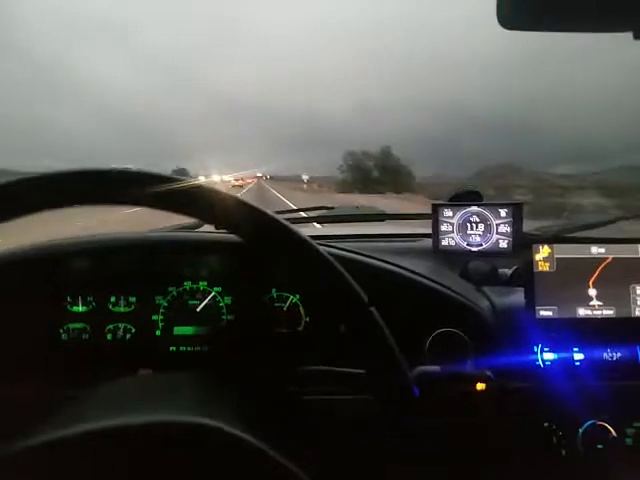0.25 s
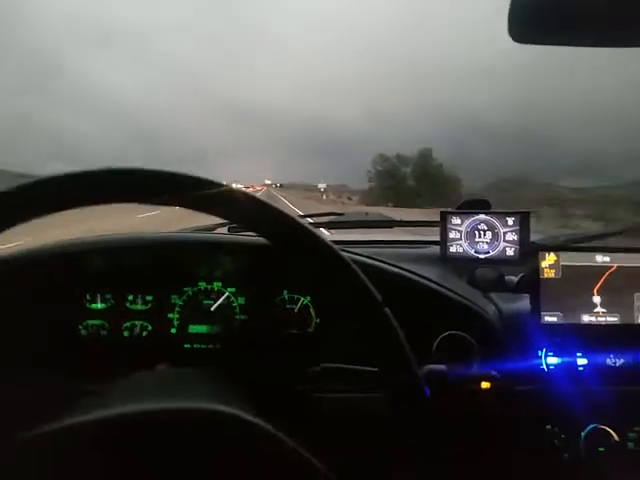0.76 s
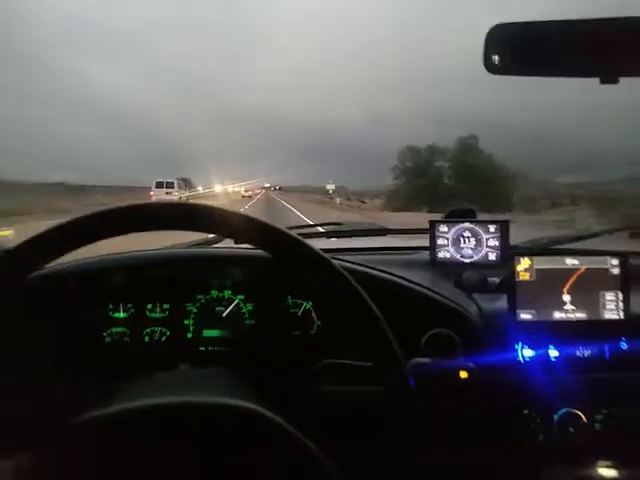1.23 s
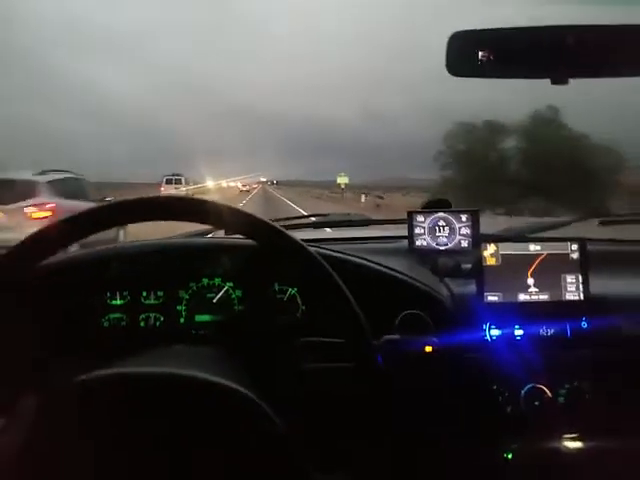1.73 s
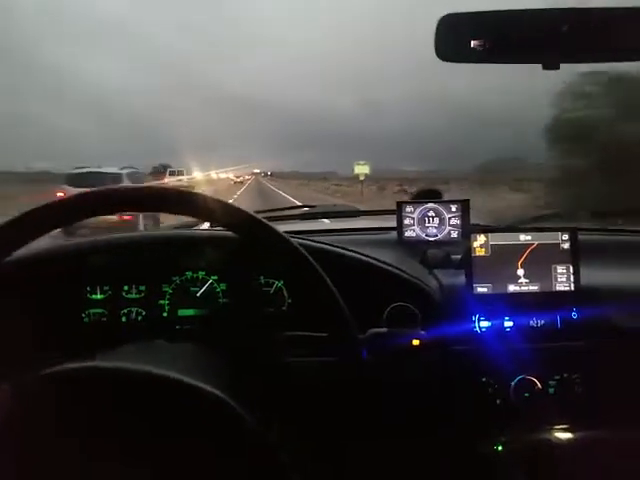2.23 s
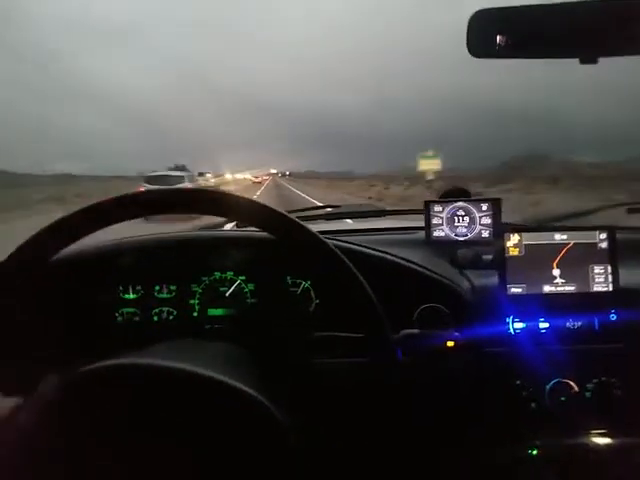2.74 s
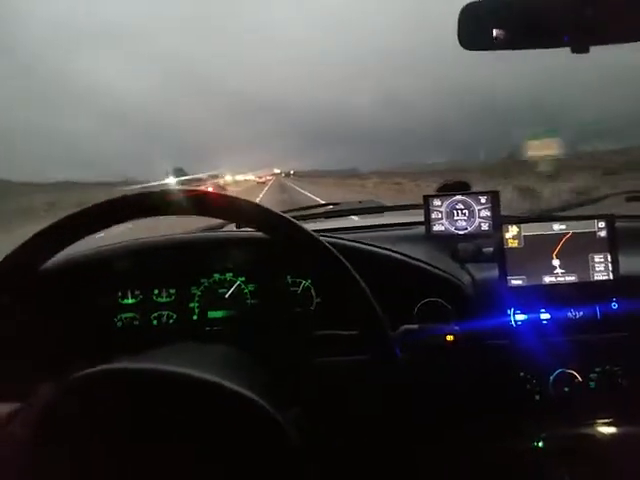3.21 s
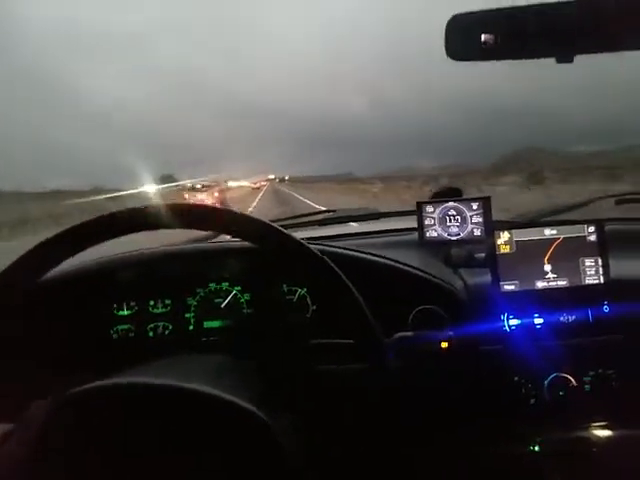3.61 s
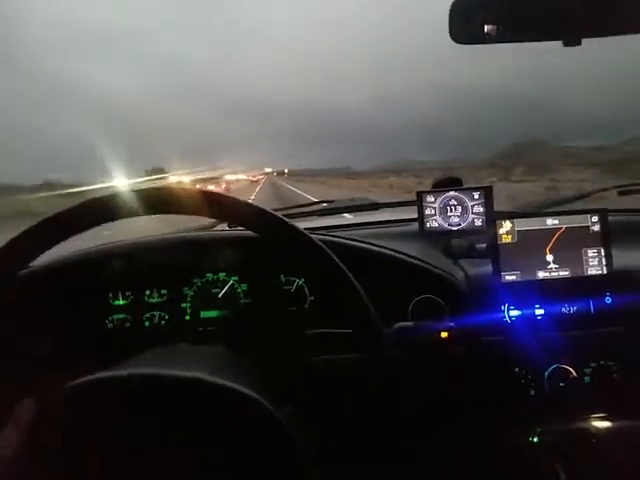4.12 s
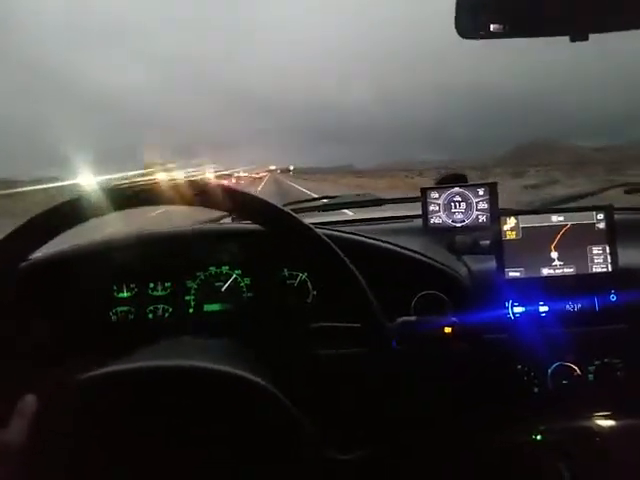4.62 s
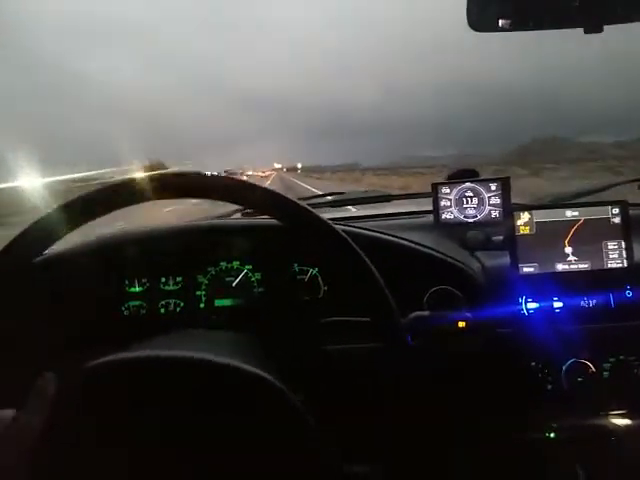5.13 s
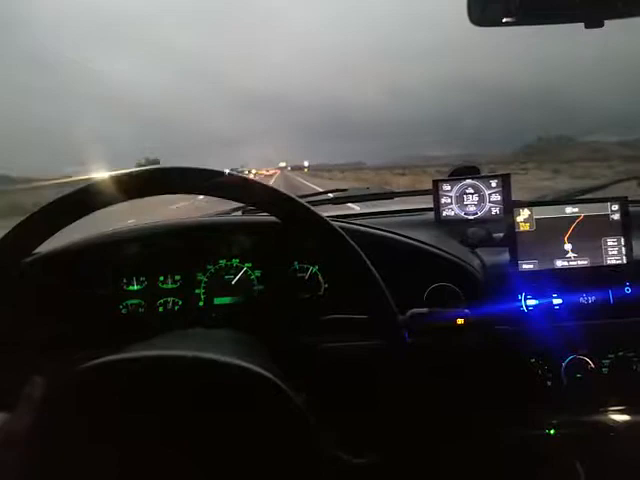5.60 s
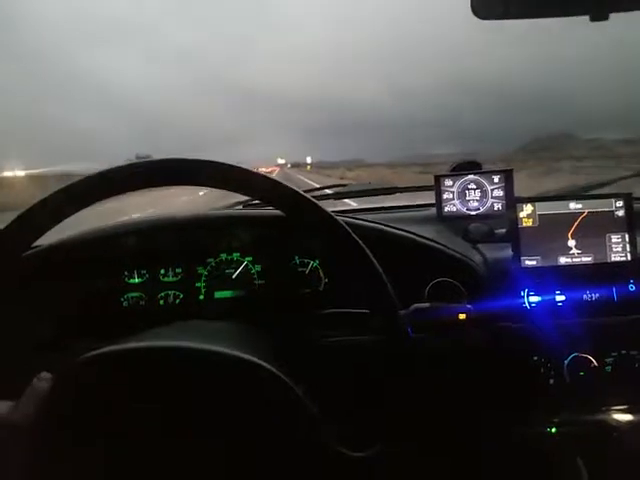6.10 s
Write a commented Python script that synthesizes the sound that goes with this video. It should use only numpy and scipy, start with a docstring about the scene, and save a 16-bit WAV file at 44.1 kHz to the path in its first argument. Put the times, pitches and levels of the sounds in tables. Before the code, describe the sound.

Inside a diesel pickup cab climbing under load, a loud steady deep exhaust drone over tyre rumble, faint turbo whistle and clatter.

```python
"""Diesel pickup cab on a long grade

Inside the cab of a V8 turbo-diesel pickup that tows uphill at nearly steady speed. Sines on the engine orders make
the exhaust drone; uneven firings set off ringing knocks and noisy clatter. The turbo is a whistle with an octave,
flutter and rush that climbs with the fuel. The drive shaft hums over shaped noise for tyres and wind, and a car
overtakes on the left."""
import sys
import numpy as np
from scipy import signal
from scipy.fft import rfft, irfft, next_fast_len
from scipy.io import wavfile
from scipy.ndimage import uniform_filter1d, minimum_filter1d

SR = 44100
rng = np.random.default_rng(int(sys.argv[2]) if len(sys.argv) > 2 else 0)


def wav_record(signal):
    """Record a signal, one row per channel, as 16-bit PCM in the file named by sys.argv[1]."""
    frames = np.transpose(np.atleast_2d(signal))
    bounded = np.clip(frames, -1, 1)
    # unit amplitude maps onto the largest positive 16-bit level
    quanta = np.round(bounded * 32767).astype(np.int16)
    wavfile.write(sys.argv[1], SR, quanta)


N = 280035

# exhaust orders, as multiples of the four-stroke cycle (8 is the firing rate): order, left_db, right_db
EXHAUST_ORDERS = [(2, -30, -31.5), (3, -35.5, -41), (4, -19, -22.5), (6, -21, -24.5), (7, -46.5, -43),
                  (8, -13.5, -14.5), (9, -30, -44.5), (12, -44, -40), (14, -30.5, -31.5),
                  (15, -27.5, -31.5), (16, -49, -54), (17, -48, -51), (18, -36, -36), (19, -46, -54.5),
                  (20, -37.5, -52.5), (21, -53, -56), (22, -55, -55), (24, -45.5, -43), (25, -45, -56),
                  (26, -40.5, -47), (27, -40.5, -52), (28, -39, -51), (31, -52.5, -45), (33, -46, -59),
                  (35, -44, -48), (37, -43, -52.5)]
# strength of each cylinder in firing order: level_db
CYLINDER_LEVELS = [0, 1.5, -4.5, -1.5, -4, -4.5, -1.5, -3]
# spectrum of the knock through the bulkhead: freq_hz, density_db
KNOCK_SPECTRUM = [(420, -30), (530, -9.5), (640, -1), (720, -5.5), (820, 4), (940, -1), (1250, -6),
                  (1750, -18), (2450, -14), (3200, -22), (6000, -34.5)]
# spectrum of the combustion clatter: freq_hz, density_db
CLATTER_SPECTRUM = [(200, -13.5), (350, 4.5), (520, -5), (640, -3), (830, -4), (1000, -15.5), (1600, -19),
                    (2300, -17), (3200, -24.5), (5500, -34.5), (9000, -33.5)]
# spectrum of tyre rumble through the floor: freq_hz, density_db
TYRE_SPECTRUM = [(10, -25.5), (32, -3.5), (55, -6), (90, -3), (120, -1.5), (170, 3), (225, -1.5), (255, 0),
                 (295, -10), (400, -6.5), (500, -19), (900, -22), (2000, -38.5)]
# spectrum of wind along the door seals: freq_hz, density_db
WIND_SPECTRUM = [(600, -16), (900, -7), (1300, -2), (1700, -5.5), (2150, -3), (2600, -8), (3000, -13),
                 (3900, -15), (5200, -16), (6300, -19.5), (7300, -20), (8300, -35), (14000, -44.5)]
# resonance of the turbo's intake duct: freq_hz, gain_db
DUCT_RESONANCE = [(6800, -8.5), (7200, 0), (7600, 4.5), (7820, -1), (8100, -16.5)]
# the driver's foot, joined by straight lines: time_s, fuel_share (0-1 of full fuel)
FUEL_PEDAL = [(0.0, 0.665), (0.26, 0.72), (1.57, 0.718), (2.32, 0.617), (3.15, 0.579), (3.6, 0.965),
              (4.83, 0.89), (5.01, 0.915), (6.35, 0.813)]
# swells and dips of the whistle: centre_s, half_length_s, blade_gain_db, octave_gain_db
WHISTLE_FLARES = [(.5, 0.11, 5, -5), (.98, .11, 2, 6), (1.24, .14, 18.5, 3), (1.42, .08, 0, 7),
                  (3.62, 0.17, 12, 1), (4.23, .11, -4, 5), (5.868, .13, 8, 3)]
# spectrum of the hiss at the glass: freq_hz, density_db
GLASS_SPECTRUM = [(9000, -4.5), (13000, 1.5), (16000, 2)]
# spectrum of the passing car's tread: freq_hz, density_db
TREAD_SPECTRUM = [(550, -11.5), (800, 0.5), (1050, -6.5), (1700, -14.5), (2600, -13), (3200, -25.5)]

CYLINDERS = len(CYLINDER_LEVELS)
TIME_S = np.arange(N) / SR
PORT_LAG_S = 0.000385  # sound from the driver's side reaches the left port first
# the speed a steady foot would hold on this grade; truck and trailer are slow to follow
BASE_RPM, RPM_PER_FUEL, TRUCK_LAG_S = 2657, 128.6, 1.67
# the turbo's blade tone follows the fuel much sooner
BASE_HZ, HZ_PER_FUEL, TURBO_LAG_S = 6000, 2000, .25
PULL_DB = 8.5  # rise of the firing order per unit of fuel beyond what holds the present speed
# peak levels at the mean turbo speed, before fades, flares and panning
WHISTLE_DB, OCTAVE_DB = -59, -62.0
WHISTLE_DB_PER_HZ, OCTAVE_DB_PER_HZ = 0.0035, 0.0109  # both grow as the wheel speeds up
# the car: when it is level with the window, how much faster it goes, how far aside
ABREAST_S, OVERTAKE_M_S, LANE_M = .55, 2.7, 5.3
CAR_DB = -38.5  # its tyres when abreast, before panning
CEILING, TOP_HZ = .96, 15720  # limiter's peak and upper edge of the band


def undb(db):
    """Turn decibels into gain."""
    return 10 ** (np.asarray(db) / 20)


def level(x, db):
    """Set the rms level."""
    return x * undb(db) / np.sqrt(np.mean(x ** 2))


def pan(db):
    """Gains of the two ports for a left minus right level."""
    return undb(np.array([[db], [-db]]) / 2)


def walk(rate):
    """Smooth random drift of rms 1 that changes about rate times a second."""
    f = np.fft.rfftfreq(N, 1 / SR)
    push = rng.standard_normal(len(f)) + 1j * rng.standard_normal(len(f))
    drift = irfft(push / (1 + (f / rate) ** 2), next_fast_len(N))[:N]
    return level(drift, 0)


def lag(x, lag_s):
    """Follow a control with inertia, starting settled."""
    keep = np.exp(-1 / (lag_s * SR))
    return x[0] + signal.lfilter([1 - keep], [1, -keep], x - x[0])


def colour(x, spectrum):
    """Filter by a spectrum on a log frequency scale, with steep ends."""
    f = np.fft.rfftfreq(N, 1 / SR) + 1  # keeps clear of zero
    hz, db = np.transpose(spectrum)
    ends = np.minimum(f / hz[0], 1) ** 2 * np.minimum(hz[-1] / f, 1) ** 2
    gain = undb(np.interp(np.log(f), np.log(hz), db))
    return irfft(rfft(x) * ends * gain, N)


def cab_noise(alike_hz, direct):
    """Noise at two ports: long waves alike, short ones diffuse, plus a direct share that arrives with a lag."""
    f = np.fft.rfftfreq(N, 1 / SR)
    mid, side, near = rfft(rng.standard_normal((3, N)))
    alike = 1 / (1 + (f / alike_hz) ** 2)
    common = mid * np.sqrt(1 + alike)
    opposed = np.array([[1], [-1]]) * side * np.sqrt(1 - alike)
    diffuse = (common + opposed) / np.sqrt(2)
    lagged = near * np.exp(-2j * np.pi * f * np.array([[0], [PORT_LAG_S]]))
    return irfft(diffuse + direct * (1 - alike) * lagged, N)


def reflections(x, share, ring_s):
    """Early echoes off glass and trim leave fine fixed ripples in the spectrum at each port."""
    t = np.arange(SR // 20) / SR
    tail = rng.standard_normal((2, len(t))) * np.exp(-t / ring_s)
    tail = tail / np.sqrt(np.sum(tail ** 2, axis=1, keepdims=True))
    return x + share * signal.oaconvolve(x, tail, axes=1)[:, :N]


def road(car_near, tyres_db, wind_db, hiss_db, wake_db):
    """Tyres rumble through the floor; wind rushes at the seals and hisses at the glass, more in the car's wake."""
    rumble = colour(cab_noise(alike_hz=740, direct=1.0), TYRE_SPECTRUM)
    tyres = level(rumble, tyres_db) * undb(0.35 * walk(8.3)) * pan(0.39)
    seals = reflections(cab_noise(alike_hz=500, direct=0.85), share=0.87, ring_s=0.018)
    wind = level(colour(seals, WIND_SPECTRUM), wind_db) * pan(-0.65)
    glass = reflections(cab_noise(alike_hz=700, direct=0.17), share=0.22, ring_s=.015)
    hiss = level(colour(glass, GLASS_SPECTRUM), hiss_db) * pan(3)
    return tyres + (wind + hiss) * undb(wake_db * car_near)


def overtaking(car_near):
    """A car's tyres sing through the driver's window and fade with distance and angle as it draws ahead."""
    tread = colour(cab_noise(alike_hz=600, direct=1.2), TREAD_SPECTRUM)
    return level(tread, CAR_DB) * car_near ** 2 * pan(2.4)


def shaft(cycle, db):
    """In overdrive the drive shaft turns 4/3 as fast as the crank; its joints hum four times a turn."""
    turns = 2 * cycle * 4 / 3  # the crank turns twice per cycle
    phase = 2 * np.pi * 4 * turns + .6 * walk(3)
    return level(np.sin(phase) * undb(2 * walk(4.6)), db)


def turbulence(rate):
    """Turbulence shakes size and phase, differently at each port."""
    return np.array([walk(rate) + 1j * walk(rate) for _ in range(2)])


def turbo(cycle, fuel, jitter_hz, fade_db, octave_rush_db, flutter_db, rush_db):
    """Blades whistle with an octave; exhaust pulses add side tones that ring in the duct with rushing air."""
    hz = BASE_HZ + HZ_PER_FUEL * lag(fuel, TURBO_LAG_S)
    speeding_hz = hz - hz.mean()
    first_db = WHISTLE_DB + WHISTLE_DB_PER_HZ * speeding_hz + fade_db * walk(5)
    second_db = OCTAVE_DB + OCTAVE_DB_PER_HZ * speeding_hz
    for centre_s, half_s, blade_db, octave_db in WHISTLE_FLARES:
        flare = np.exp(-((TIME_S - centre_s) / half_s) ** 2)
        first_db = first_db + blade_db * flare
        second_db = second_db + octave_db * flare
    blade = np.exp(2j * np.pi * np.cumsum(hz + jitter_hz * walk(20)) / SR)
    first = np.real((1 + .3 * turbulence(9)) * blade) * undb(first_db)
    # the faster the wheel spins, the more its octave frays into hiss
    fray = undb(octave_rush_db + 5 * speeding_hz / np.ptp(hz))
    second = np.real((1 + fray * turbulence(200)) * blade ** 2) * undb(second_db)
    pulsing = np.sin(2 * np.pi * CYLINDERS * cycle)
    side_tones = np.real((1 + .5 * turbulence(15)) * blade) * pulsing
    flutter = level(colour(side_tones, DUCT_RESONANCE), flutter_db)
    rush = level(colour(np.real(turbulence(260) * blade), DUCT_RESONANCE), rush_db)
    return (first + flutter + rush) * pan(2.3) + second * pan(12)


def clatter(cycle, fade_strokes, db):
    """Combustion noise jumps up at each firing and decays until the next."""
    stroke, age = np.divmod(cycle * CYLINDERS, 1)
    strength = undb(CYLINDER_LEVELS)[stroke.astype(int) % CYLINDERS]
    bursts = cab_noise(alike_hz=785, direct=0.55) * strength * np.exp(-age / fade_strokes)
    return level(colour(bursts, CLATTER_SPECTRUM), db)


def knock(cycle, scatter_db, ring_s, db):
    """Each cylinder strikes the block, which rings along that cylinder's own path to the ports."""
    stroke = np.floor(cycle * CYLINDERS).astype(int)
    fired = np.flatnonzero(np.diff(stroke)) + 1
    size = undb(scatter_db * rng.standard_normal(len(fired)))
    t = np.arange(SR // 20) / SR
    paths = cab_noise(alike_hz=800, direct=1.0)
    out = 0
    for c, cylinder_db in enumerate(CYLINDER_LEVELS):
        blows = np.zeros((1, N))
        blows[0, fired] = size * (stroke[fired] % CYLINDERS == c) * undb(cylinder_db)
        path = paths[:, c * len(t):(c + 1) * len(t)] * np.exp(-t / ring_s)
        out = out + signal.oaconvolve(blows, path, axes=1)[:, :N]
    return level(colour(out, KNOCK_SPECTRUM), db)


def drone(cycle, load_db, waver, firing_waver, smear, scatter, load_share):
    """Exhaust orders boom in the cab; the firing order is firm, those of the uneven banks waver."""
    out = 0
    for order, left_db, right_db in EXHAUST_ORDERS:
        order = round(order)
        firing = order == CYLINDERS
        unrest = (firing_waver if firing else waver) * (walk(5.3) + 1j * walk(13))
        # the long pipe smears each crest; the cab scatters higher orders differently to each port
        offset = (smear + scatter * rng.standard_normal((2, 1))) * (order / CYLINDERS) ** 2
        turning = np.exp(2j * np.pi * order * cycle) * np.exp(1j * offset)
        tone = np.real((1 + unrest) * turning) * np.sqrt(2)
        pull = undb(load_db * (1 if firing else load_share))
        out = out + undb([[left_db], [right_db]]) * tone * pull
    return out


def scene():
    """The fuel sets engine speed, pull and turbo speed; one crankshaft drives every engine layer."""
    pedal_s, pedal_fuel = np.transpose(FUEL_PEDAL)
    fuel = np.interp(TIME_S, pedal_s, pedal_fuel)
    holding = lag(fuel, TRUCK_LAG_S)  # the fuel that would just hold the present speed
    rpm = BASE_RPM + RPM_PER_FUEL * holding
    cycle = np.cumsum(rpm / 60 / 2) / SR  # four-stroke cycles so far
    load_db = PULL_DB * (fuel - holding)
    load_db = load_db - np.mean(load_db)
    ahead_m = OVERTAKE_M_S * (TIME_S - ABREAST_S)
    car_near = LANE_M / np.hypot(LANE_M, ahead_m)  # 1 when abreast

    outside = road(car_near, tyres_db=-21.0, wind_db=-38.0, hiss_db=-51.5, wake_db=1.3)
    outside = outside + overtaking(car_near)
    hum = shaft(cycle, db=-30)
    whistle = turbo(cycle, fuel, jitter_hz=7, fade_db=2.5, octave_rush_db=2.5, flutter_db=-64.5, rush_db=-56.0)
    block = clatter(cycle, fade_strokes=3, db=-34.5) * pan(1.3)
    block = block + knock(cycle, scatter_db=1.8, ring_s=0.008, db=-40.0) * pan(1.7)
    exhaust = drone(cycle, load_db, waver=0.27, firing_waver=0.027, smear=2.193, scatter=.14, load_share=0.34)
    return outside + hum + whistle + block * undb(0.53 * load_db) + exhaust


def record(dry):
    """A limiter eases the gain down around the highest crests, then the top of the band is cut."""
    room = np.minimum(CEILING / (np.abs(dry).max(axis=0) + 1e-9), 1)
    gain = uniform_filter1d(minimum_filter1d(room, size=1200), size=1100)
    low_pass = signal.ellip(10, .1, 60, TOP_HZ, fs=SR, output="sos")
    return signal.sosfiltfilt(low_pass, dry * gain)


dry = scene()
out = record(dry)
wav_record(out)
```